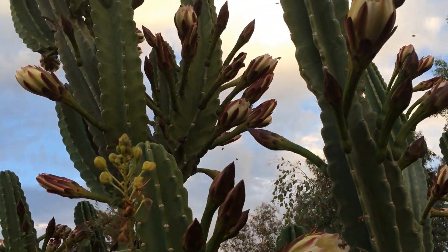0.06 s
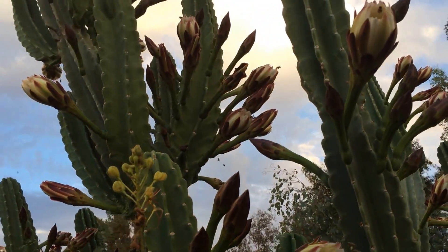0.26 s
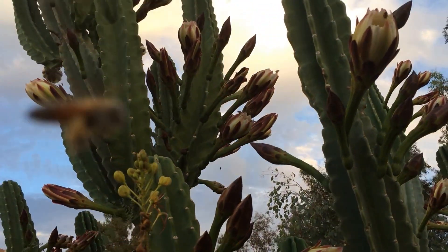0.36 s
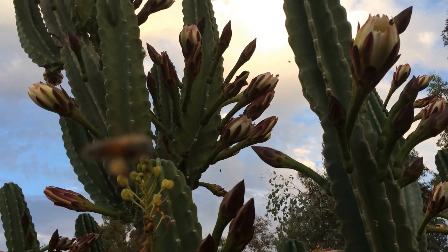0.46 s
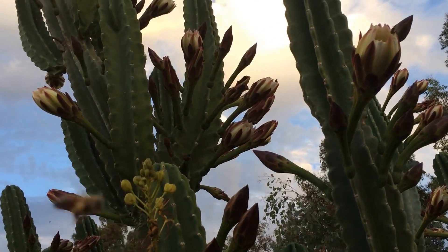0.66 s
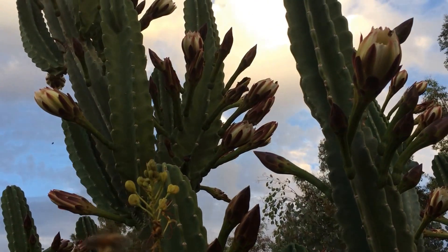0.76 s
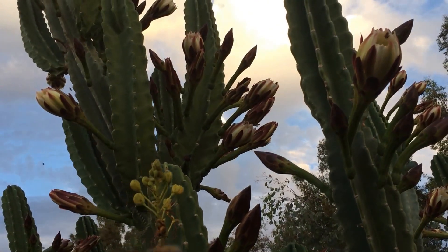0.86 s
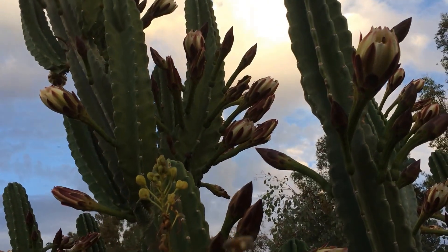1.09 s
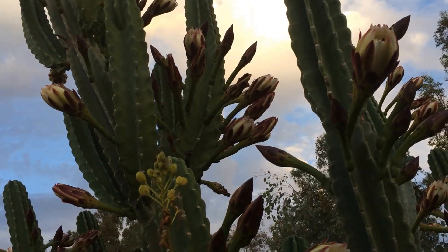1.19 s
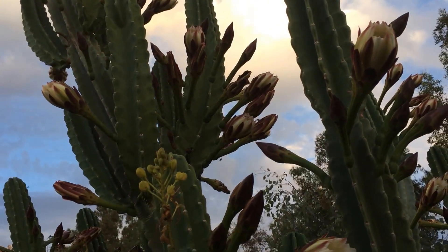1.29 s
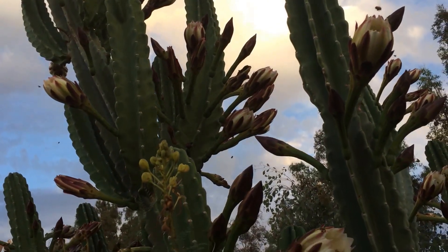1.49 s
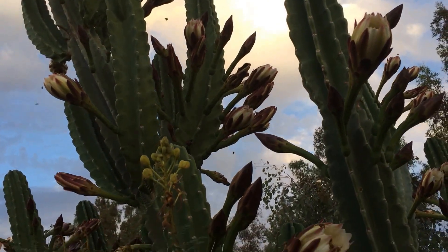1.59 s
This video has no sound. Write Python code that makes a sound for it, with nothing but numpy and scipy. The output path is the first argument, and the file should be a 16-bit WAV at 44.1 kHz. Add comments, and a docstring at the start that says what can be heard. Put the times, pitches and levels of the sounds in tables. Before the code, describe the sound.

A bee buzzes right past the microphone, then fades to a faint hum outdoors.

```python
"""A quiet garden, where a bee flies right past the microphone and then hovers some way off.
Each wingbeat gives a hum with overtones, a thin whine, a tick and a short rasp of air.
At the closest point the wash of the wings buffets the microphone.
Farther back are other bees at the flowers, outdoor hiss and a light breeze."""
import sys
import numpy as np
from scipy import signal
from scipy.fft import rfft, irfft
from scipy.io import wavfile
from scipy.ndimage import uniform_filter1d

SR = 44100
rng = np.random.default_rng(int(sys.argv[2]) if len(sys.argv) > 2 else 0)


def store_pcm(level_fs):
    """Save levels as 16-bit WAV."""
    pcm = np.round(np.clip(level_fs, -1, 1) * 32767).astype(np.int16)
    wavfile.write(sys.argv[1], SR, np.atleast_2d(pcm).T)


N = 72765
TIME = np.arange(N) / SR

# The near bee's wings. Each row: time in seconds, wingbeat rate in Hz.
WINGBEAT_RATE = [(0, 281), (.04, 275), (.08, 278), (.12, 274), (.165, 262), (.2, 279), (.275, 282),
                 (.32, 269), (.365, 261), (.41, 278), (.475, 282), (.53, 261), (.59, 280), (.645, 281),
                 (.71, 272), (.77, 252), (.85, 279), (1.08, 272), (1.21, 279), (1.3, 257), (1.38, 272),
                 (1.5, 255), (1.65, 262)]
def flight(pass_s=0.316, turn_s=0.035, jitter=0.00419):
    """The running count of wingbeats, and the side facing the microphone: 0 front, 1 behind."""
    rate_hz = curve(WINGBEAT_RATE) * (1 + jitter * wander(rate_hz=51))
    behind = .5 + .5 * np.tanh((TIME - pass_s) / turn_s)
    return np.cumsum(rate_hz) / SR, behind


# The hum as the bee nears the microphone and leaves. Each row: time in seconds, level in dB.
HUM_LEVEL = [(0, -56.5), (.035, -64), (.08, -54.5), (.165, -50), (.2, -41), (.246, -28.5), (.278, -23.5),
             (.312, -30), (.338, -34.5), (.36, -40), (.395, -42.5), (.434, -50.5), (.49, -53), (.54, -59),
             (.6, -56.5), (.66, -61), (.74, -71), (.85, -61), (1.12, -76.5), (1.19, -58.5), (1.3, -68.5),
             (1.65, -71.5)]
# The hum at close range. Each row: harmonic number, gain in dB from the front, and from behind.
HUM_HARMONICS = [(1, -1, -11.5), (2, -0.5, -1), (3, -25.5, -23.5), (4, -18.5, -29.5), (5, -20.5, -28.5),
                 (6, -29, -30), (7, -37, -39)]
def hum(beats, behind, close_db=-19.5, overtone_slope=0.81):
    """Low harmonics of the wingbeat: round up close, thinner and less steady far away."""
    hum_db = curve(HUM_LEVEL)
    overtone_db = close_db + overtone_slope * (hum_db - close_db)  # fades more slowly with distance
    far = (hum_db.max() - hum_db) / np.ptp(hum_db)
    flutter_db = 1.07 + 4 * far ** 2
    out = np.zeros(N)
    for k in range(1, len(HUM_HARMONICS) + 1):
        db = harmonic_db(k, HUM_HARMONICS, behind) + (hum_db if k <= 2 else overtone_db)
        db += flutter_db * wander(rate_hz=49)
        phase = (k > 2) * rng.uniform(0, 2 * np.pi)  # the lowest two stay in step
        out += amp(db) * np.sqrt(2) * np.cos(2 * np.pi * k * beats + phase)
    return out * amp(0.33 * wander(rate_hz=120))  # no two wingbeats are equally strong


# The thin whine around 3 kHz. Each row: time in seconds, level in dB.
WHINE_LEVEL = [(0, -70.5), (.15, -65.5), (.17, -63.5), (.2, -56), (.225, -57), (.268, -46), (.31, -49),
               (.35, -61), (.38, -53), (.45, -62.5), (.48, -58.5), (.52, -62), (.555, -70), (.62, -61.5),
               (.76, -78.5), (.94, -70), (1.25, -74.5), (1.4, -83), (1.65, -84)]
# Its overtones. Each row: harmonic number, gain in dB from the front, and from behind.
WHINE_OVERTONES = [(8, -11.5, -14.5), (9, -2.5, -18.5), (10, -7.5, -8), (11, -6, -17), (12, -16, -8.5),
                   (13, -15, -15), (14, -17, -18.5)]
def whine(beats, behind):
    """Middle harmonics of the wingbeat, sounding in step."""
    return harmonics_in_step(beats, behind, range(8, 15), WHINE_OVERTONES, curve(WHINE_LEVEL))


# The rasp of the wings at the microphone. Each row: time in seconds, level in dB.
RASP_LEVEL = [(0, -74.5), (.12, -62.5), (.165, -63.5), (.2, -55.5), (.235, -56), (.285, -47), (.31, -54.5),
              (.345, -59.5), (.42, -59), (.45, -60), (.49, -56), (.518, -56.5), (.54, -65), (.62, -60.5),
              (.75, -68), (1.2, -70.5), (1.35, -77), (1.65, -89)]
# Its colour. Each row: frequency in Hz, relative level in dB.
RASP_SPECTRUM = [(100, -14), (900, 0), (1900, 8), (2900, 7.5), (4500, 3.5), (6000, 3.5), (8000, 5.5),
                 (10500, 4.5), (14500, 1.5)]
def rasp(beats, behind, width_beats=.065):
    """A burst of air noise at each wing stroke and a weaker one on the way back."""
    stroke = np.exp(-.5 * (((beats + .5) % 1 - .5) / width_beats) ** 2)
    backstroke = np.exp(-.5 * ((beats % 1 - .5) / width_beats) ** 2)
    back_share = .75 * (1 - behind) + .35 * behind
    gate = .35 + stroke + back_share * backstroke  # some air is heard between strokes
    uneven = amp(0.6 * wander(rate_hz=760))
    return amp(curve(RASP_LEVEL)) * colour(gate * uneven * rng.standard_normal(N), RASP_SPECTRUM)


# The tick, relative to the rasp. Each row: harmonic number, gain in dB from the front, and from behind.
TICK_HARMONICS = [(15, -15, -17), (20, -19, -20), (28, -25, -24), (54, -25, -23)]
def tick(beats, behind):
    """High harmonics line up into a sharp tick as the wings flip over."""
    tick_db = curve(RASP_LEVEL) + 1.6 * wander(rate_hz=27)
    return harmonics_in_step(beats, behind, range(15, 55), TICK_HARMONICS, tick_db)


# The wash of the wings, right at the microphone. Each row: time in seconds, level in dB.
WASH_LEVEL = [(.19, -67), (.255, -51), (.275, -47), (.284, -28), (.3, -19.5), (.312, -24), (.323, -25.5),
              (.332, -32), (.35, -34.5), (.39, -44.5), (.425, -45.5), (.45, -72)]
# The gust's colour at its core and at its edges. Each row: frequency in Hz, relative level in dB.
CORE_SPECTRUM = [(25, -29), (70, -6), (130, -3), (290, -3), (470, 2), (650, -0.5), (900, -7), (1250, -12),
                 (1600, -28.5), (2500, -30.5), (5000, -46)]
EDGE_SPECTRUM = [(25, -20), (60, -5), (110, 0), (180, -2), (300, -11), (450, -16), (700, -24), (1500, -40),
                 (5000, -60)]
def wing_wash(gust_s=0.3055, width_s=0.021):
    """Eddies from the wings hit the microphone: bright in the core of the gust, dull at its edges."""
    core = np.exp(-((TIME - gust_s) / width_s) ** 4)
    eddies = rng.standard_normal(N)
    flow = core * colour(eddies, CORE_SPECTRUM) + (1 - core) * .5 * colour(eddies, EDGE_SPECTRUM)
    running_rms = np.sqrt(uniform_filter1d(flow ** 2, size=600) + 1e-9)
    return amp(curve(WASH_LEVEL)) * flow / running_rms


# Single puffs on the microphone. Each row: centre in seconds, peak level in dB, width in seconds.
AIR_PUFFS = [(0.2835, -17, 0.0012), (0.2885, -9.5, 0.000436), (0.3163, -11.5, 0.00045),
             (0.4089, -27, 0.002), (1.433, -41, 0.0023)]
def puffs():
    """Each lone eddy is one swing of pressure, down then up."""
    out = np.zeros(N)
    for centre_s, db, width_s in AIR_PUFFS:
        offset = (TIME - centre_s) / width_s
        out += amp(db) * offset * np.exp(.5 * (1 - offset ** 2))
    return out


# Other bees, off among the flowers. Each row: wingbeat rate in Hz, level in dB.
DISTANT_BEES = [(251, -68.5), (262, -69), (279, -71.5)]
# Their tone from a distance. Each row: harmonic number, relative level in dB.
DISTANT_HARMONICS = [(1, -2.5), (2, 1.5), (3, -0.5), (4, -1), (5, -1), (6, -37), (7, -11), (9, -11),
                     (13, -10), (16, -23)]
def distant_bees(pitch_drift=.018, swell_db=2.5):
    """A few more bees drift in pitch and level and beat against each other."""
    out = np.zeros(N)
    for hz, db in DISTANT_BEES:
        beats = np.cumsum(hz * (1 + pitch_drift * wander(rate_hz=5.86))) / SR
        tone = np.zeros(N)
        for k in range(1, 17):
            gain = amp(np.interp(k, *np.transpose(DISTANT_HARMONICS)))
            tone += gain * np.cos(2 * np.pi * (k * beats + rng.random()))
        out += amp(db + swell_db * wander(rate_hz=7.4)) * unit(tone)
    return out


# The open air all around the microphone. Each row: time in seconds, level in dB.
HISS_LEVEL = [(0, -54.5), (.5, -58.5), (.72, -56.5), (.92, -55), (1.25, -56.5), (1.65, -58)]
# Its colour. Each row: frequency in Hz, relative level in dB.
HISS_SPECTRUM = [(25, 9), (100, 9.5), (250, -3), (390, -8), (500, 2), (750, -9.5), (1300, -1), (2000, -6),
                 (2700, -20.5), (3600, -11.5), (5200, -15.5), (7200, -11.5), (10000, -16.5), (15000, -12.5)]
def outdoor_hiss():
    """The nearly steady hiss of the garden."""
    level_db = curve(HISS_LEVEL) + 0.79 * wander(rate_hz=45)
    return amp(level_db) * colour(rng.standard_normal(N), HISS_SPECTRUM)


# The breeze through the garden. Each row: time in seconds, level in dB.
RUMBLE_LEVEL = [(0, -58.5), (.4, -50), (.52, -89), (.68, -65), (.9, -60), (1.03, -54.5), (1.2, -60.5),
                (1.45, -52.5), (1.65, -55.5)]
# Its colour. Each row: frequency in Hz, relative level in dB.
RUMBLE_SPECTRUM = [(20, -40), (45, -9), (70, 4), (100, -2), (150, -11), (280, -19), (600, -36), (3000, -63)]
def breeze():
    """A light breeze makes a low, lumpy rumble."""
    level_db = curve(RUMBLE_LEVEL) + 3.0 * wander(rate_hz=36)
    return amp(level_db) * colour(rng.standard_normal(N), RUMBLE_SPECTRUM)


def harmonics_in_step(beats, behind, numbers, table, level_db):
    """Sums harmonics that all peak together once a wingbeat."""
    return sum(amp(level_db + harmonic_db(k, table, behind)) * np.sqrt(2) * np.cos(2 * np.pi * k * beats)
               for k in numbers)


def harmonic_db(k, table, behind):
    """Gain of harmonic k, read between the rows, as the bee turns from front to back."""
    number, front, rear = np.transpose(table)
    return (1 - behind) * np.interp(k, number, front) + behind * np.interp(k, number, rear)


def amp(db):
    """Decibels to gain."""
    return 10 ** (np.asarray(db) / 20)


def unit(x):
    """Scales to rms 1."""
    return x / np.sqrt(np.mean(x ** 2) + 1e-20)


def curve(points):
    """Joins (seconds, value) points by straight lines."""
    return np.interp(TIME, *np.transpose(points))


def colour(x, points):
    """Filters by a (Hz, dB) spectrum and scales to rms 1."""
    hz, db = np.transpose(points)
    gain = amp(np.interp(np.log(np.fft.rfftfreq(N, 1 / SR) + 1), np.log(hz), db))
    return unit(irfft(rfft(x) * gain, N))


def wander(rate_hz):
    """Random motion of rms 1, mostly slower than rate_hz."""
    rolloff = 1 + (np.fft.rfftfreq(N, 1 / SR) / rate_hz) ** 4
    return unit(irfft(rfft(rng.standard_normal(N)) / rolloff, N))


def scene():
    """The near bee, its wash of air and the garden behind, all at one microphone."""
    beats, behind = flight()
    bee = hum(beats, behind) + whine(beats, behind) + tick(beats, behind) + rasp(beats, behind)
    return (bee + wing_wash() + puffs() + distant_bees() + outdoor_hiss() + breeze())[None]


def record(dry):
    """The recorder's bass cut and band limit."""
    low_cut_hz, high_cut_hz = 45, 15350
    bass_cut = signal.butter(2, low_cut_hz, "highpass", fs=SR, output="sos")
    band_limit = signal.firwin(511, high_cut_hz, window=("kaiser", 9), fs=SR)
    return signal.oaconvolve(signal.sosfilt(bass_cut, dry), band_limit[None], "same")


dry = scene()
out = record(dry)
store_pcm(out)
```